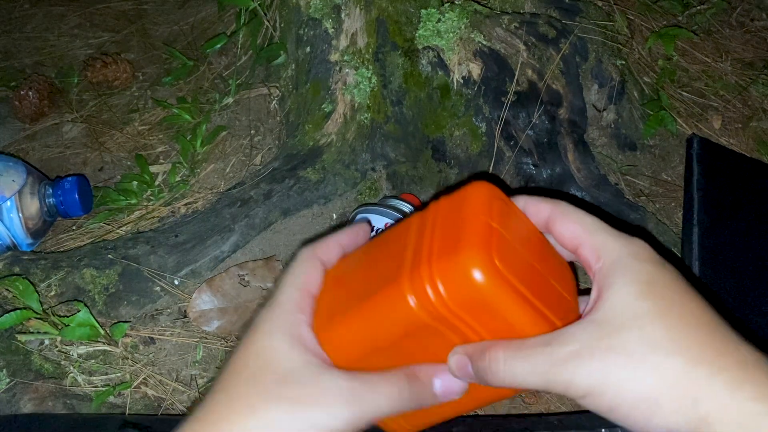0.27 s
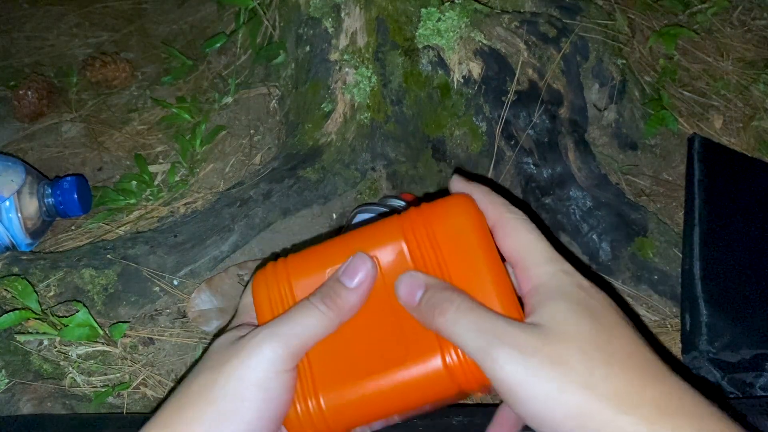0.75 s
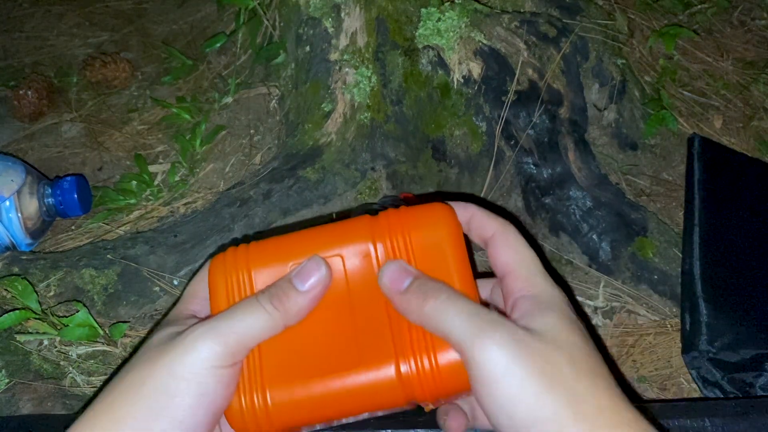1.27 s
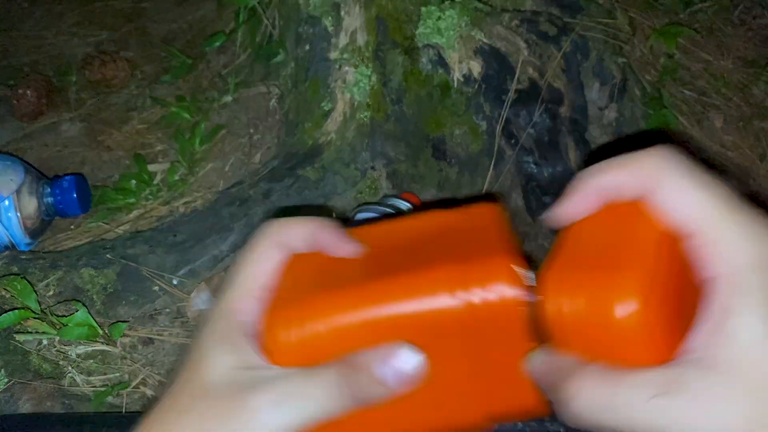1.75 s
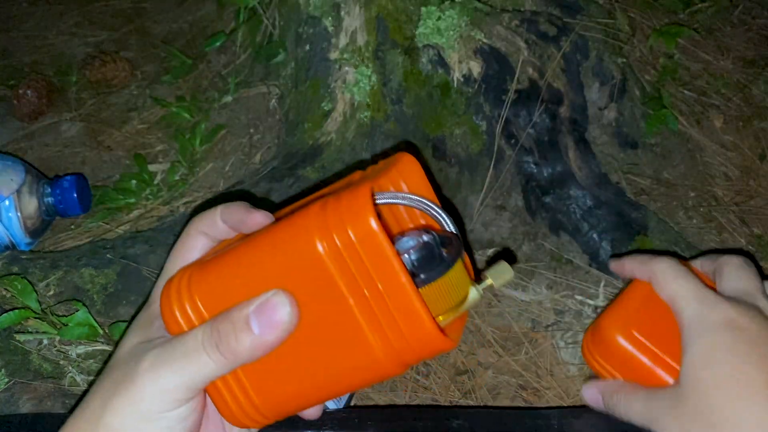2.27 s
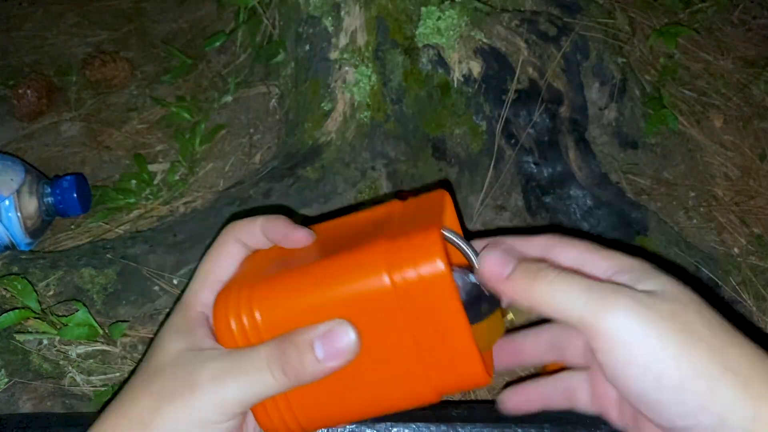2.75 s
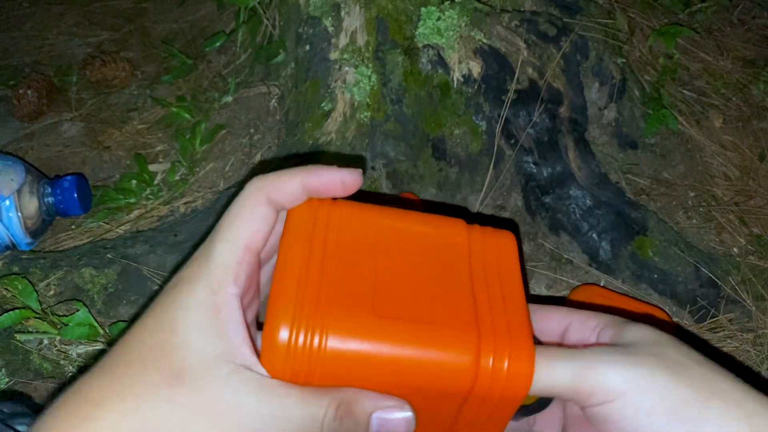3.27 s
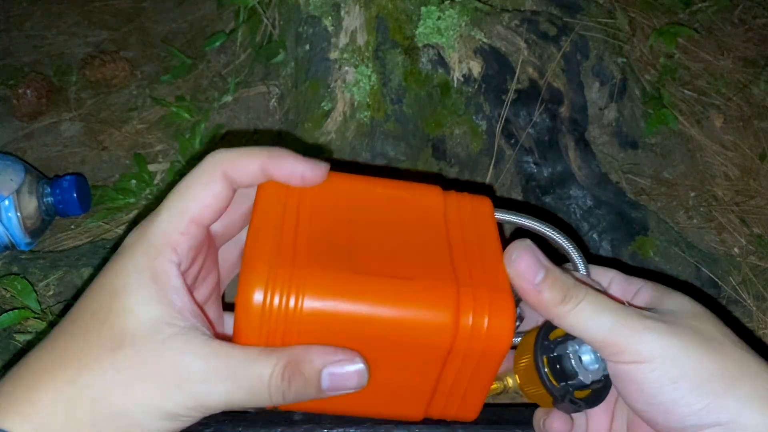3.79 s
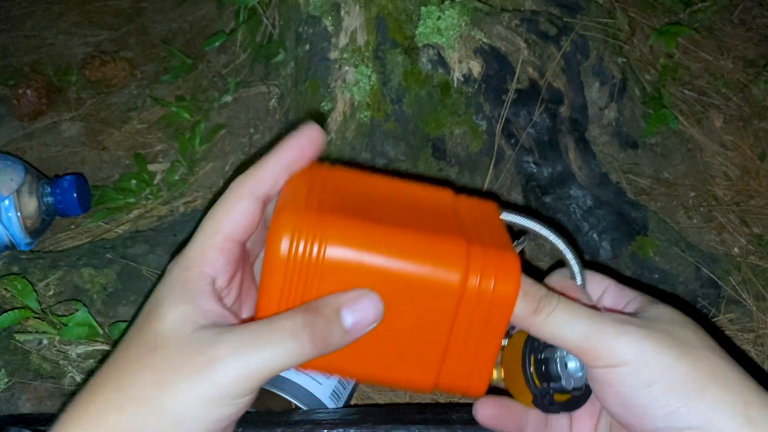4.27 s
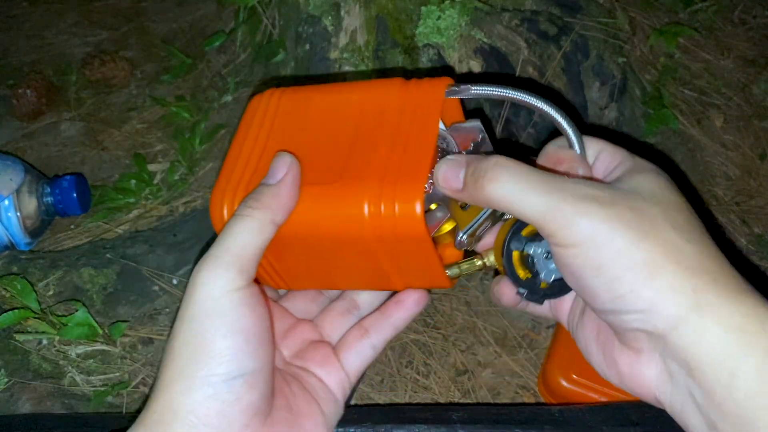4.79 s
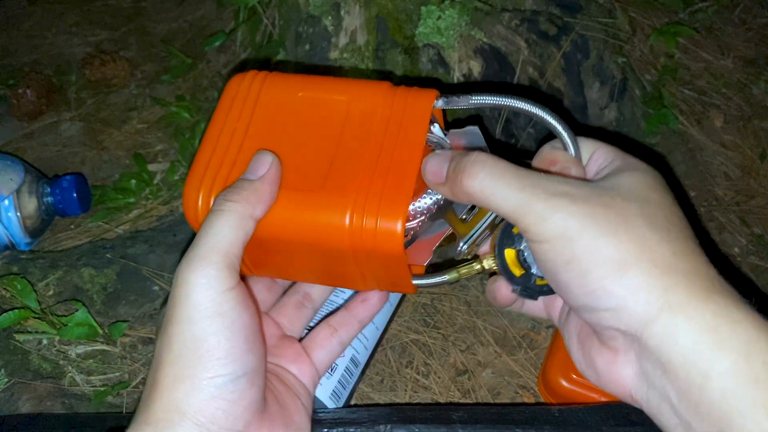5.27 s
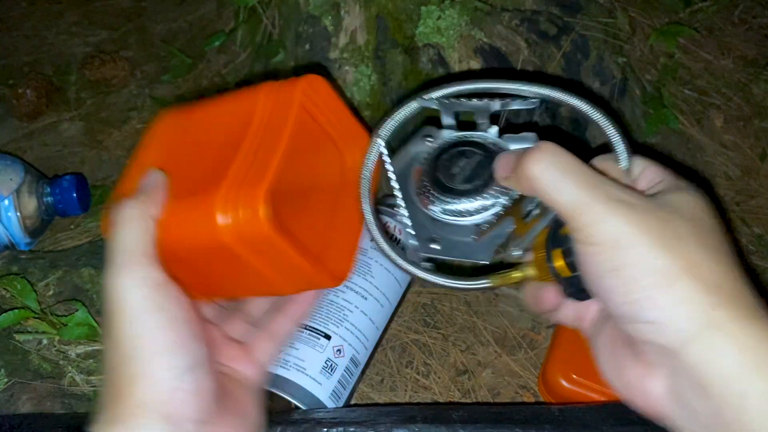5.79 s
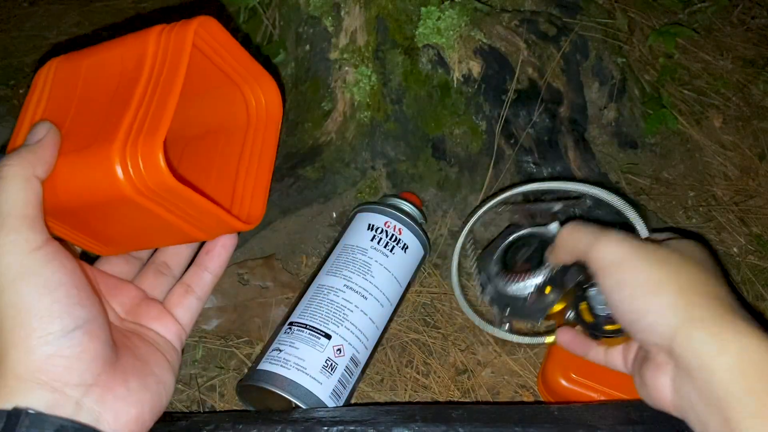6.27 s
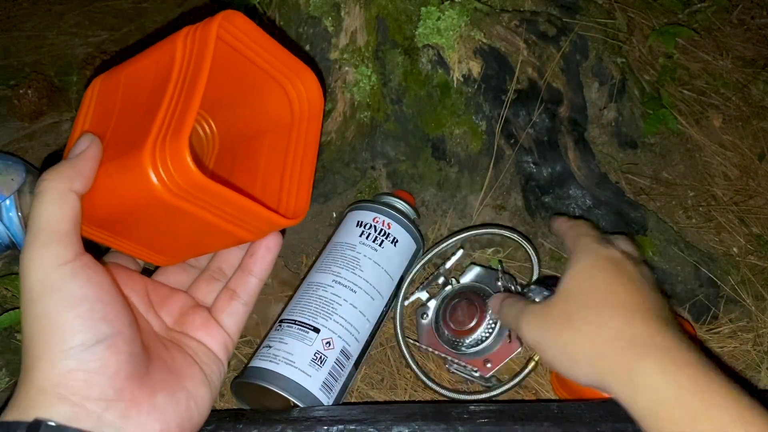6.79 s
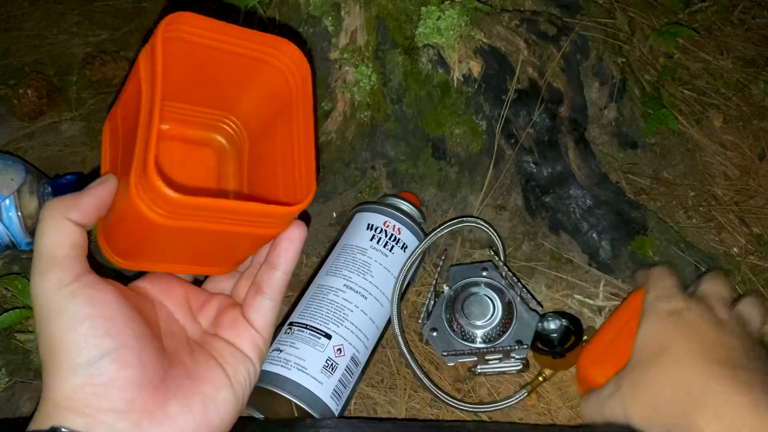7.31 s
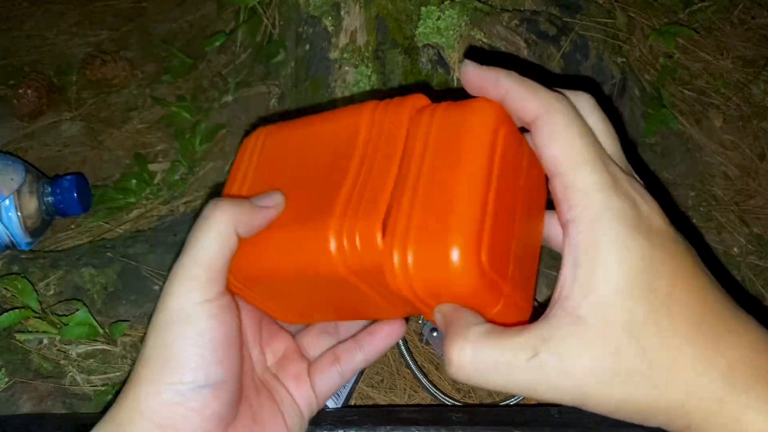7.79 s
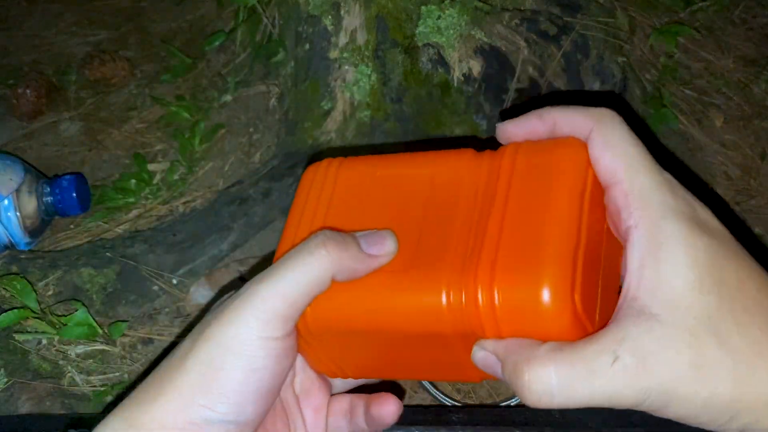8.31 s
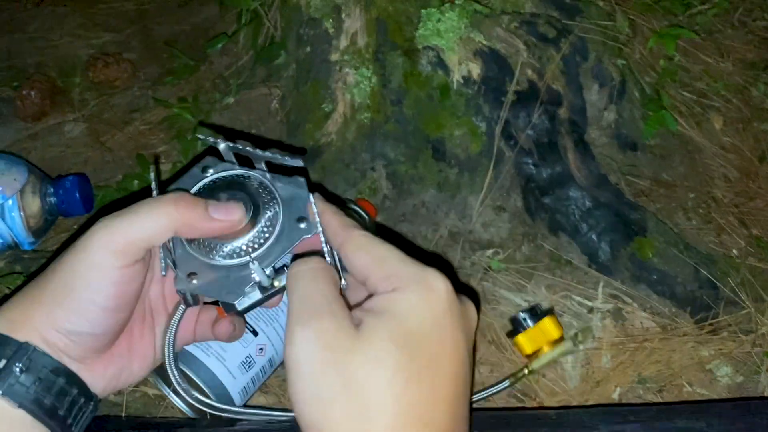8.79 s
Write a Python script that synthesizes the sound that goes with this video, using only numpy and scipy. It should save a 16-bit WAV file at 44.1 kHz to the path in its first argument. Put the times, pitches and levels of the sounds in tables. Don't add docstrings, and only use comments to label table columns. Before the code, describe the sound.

Close, dry stereo handling sounds that overload on the hardest hits. Light taps and skin rubbing on plastic, a fluttering gust, a sharp hollow pop and a dropped lid come first. Irregular small knocks, scrapes and thin steel jingles follow, then a loud release, deep wind buffeting, a ringing lid clatter and several heavy closing clacks. Things settle into small bumps over soft night air, distant insects and a faint cricket.

```python
import sys
import numpy as np
from scipy import signal
from scipy.fft import rfft, irfft
from scipy.io import wavfile

SR = 44100
rng = np.random.default_rng(int(sys.argv[2]) if len(sys.argv) > 2 else 0)


def int16_out(signal):
    q = np.round(np.clip(np.atleast_2d(signal).T, -1, 1) * 32767)
    wavfile.write(sys.argv[1], SR, q.astype(np.int16))


def volts_from_decibels(level):
    exponent = np.asarray(level, float) / 20
    return 10 ** exponent


N = 399105

# start_s, peak_db, hollow_hz
CASE_BLOWS = [(3.039, -27, 640), (3.913, -16.5, 910), (1.064, -9.5, 635), (1.245, -14.5, 588),
              (1.732, -20.5, 690), (1.781, 7, 656), (1.812, 3, 737), (1.874, -3, 760), (1.891, -2, 833),
              (1.96, -25, 530), (2.15, -21, 1240), (5.753, 11, 802), (7.791, 1.5, 832), (7.813, 7, 485),
              (7.924, 3.5, 654), (7.965, -6, 620), (7.93, -3, 608), (7.942, -12, 640), (7.982, -4, 1500),
              (7.977, -3, 637), (8.105, -8.5, 573), (8.259, -1, 530), (8.312, -13, 504),
              (8.344, -17.5, 567), (8.41, -21.5, 670), (8.597, -24.5, 513), (8.653, -30, 530),
              (1.828, -4.5, 1000), (1.902, -16, 1120), (2.01, -30, 600), (2.035, -35, 754),
              (1.066, -17.5, 1290), (2.098, -34, 700), (2.2, -28, 700), (2.225, -41, 595),
              (7.7915, -5, 1044), (7.82, -18, 1500), (7.91, -9, 1500), (7.816, 2, 840), (8.733, -25, 920)]
# start_s, peak_db, hollow_hz
STOVE_BLOWS = [(2.801, -26.5, 644), (2.892, -19.5, 610), (2.976, -27, 630), (2.995, -7.5, 517),
               (3.019, -17.5, 840), (3.108, -21, 720), (3.201, -8.5, 530), (3.242, -16, 716),
               (3.26, -12.5, 745), (3.477, -12, 690), (3.601, -16, 735), (3.706, -25.5, 910),
               (3.811, -15, 780), (4.126, -21.5, 510), (4.209, -19.5, 920), (4.27, -18.5, 1080),
               (4.388, -18, 740), (4.609, -21.5, 770), (4.705, -18, 760), (4.804, -16, 790),
               (4.842, -15, 790), (4.974, -20.5, 480), (4.995, -16, 450), (5.124, -13.5, 761),
               (5.228, -9.5, 770), (5.333, -19.5, 754), (5.354, -11.5, 766), (5.501, -22, 770),
               (5.515, -13.5, 763), (5.68, -23.5, 760), (5.79, 5, 820), (5.815, -6, 595), (7.903, -14, 690),
               (7.912, -4, 680)]
# start_s, peak_db, hollow_hz
LID_BLOWS = [(2.5455, -1.5, 884), (2.55, -4, 612), (2.595, -25.5, 1440), (2.64, -34, 1420),
             (2.656, -28.5, 1030), (6.555, -24, 1490), (6.868, 6, 600), (6.876, 6.5, 889),
             (6.902, -2.5, 1006), (6.959, -8, 656), (6.999, -11, 654), (7.03, -16, 666),
             (7.049, -16.5, 845), (7.091, -7, 610)]
# start_s, peak_db, hollow_hz
FINGER_TAPS = [(0.02, -22.5, 480), (0.058, -27, 1220), (0.076, -21.5, 854), (0.166, -13, 626),
               (0.169, -18, 1200), (0.215, -17.5, 1900), (0.235, -15, 1080), (0.265, -15.5, 570),
               (0.287, -23, 700), (0.288, -20, 1900), (0.322, -16, 1900), (0.345, -32, 1500),
               (0.495, -25, 700), (0.56, -23.5, 454), (7.156, -21.5, 1750), (7.192, -21, 2000),
               (7.204, -22, 1000), (7.268, -22, 1220), (7.332, -21.5, 686), (7.364, -16.5, 1920)]
# start_s, peak_db, hollow_hz
RATTLES = [(1.085, -19, 635), (1.523, -26, 880), (1.534, -22.5, 647), (1.671, -26, 990), (3.061, -21, 715),
           (3.124, -15.5, 855), (3.142, -21, 700), (3.322, -9, 760), (3.352, -8, 806), (3.401, -19, 860),
           (3.503, -17, 710), (3.49, -23, 714), (3.553, -22, 760), (3.721, -32, 810), (3.755, -23, 880),
           (3.768, -28, 690), (4.815, -8, 760), (4.86, -23.5, 760), (4.144, -21, 1000), (4.17, -20, 610),
           (4.293, -27, 740), (4.316, -19, 780), (4.33, -27, 1500), (4.347, -23.5, 760),
           (4.419, -25.5, 770), (4.546, -32.5, 593), (4.567, -24, 717), (4.634, -22.5, 770),
           (4.719, -27, 760), (4.749, -29, 520), (4.902, -27.5, 735), (4.925, -23, 490), (5.009, -13, 523),
           (5.054, -22, 683), (5.105, -21.5, 790), (5.138, -25, 796), (5.255, -19, 730), (5.414, -28, 756),
           (5.433, -22.5, 770), (5.559, -30, 750), (5.627, -32, 730), (6.594, -29, 1500), (6.664, -34, 961),
           (7.294, -25, 880), (7.339, -20, 1770), (7.399, -30, 1420), (7.415, -26.5, 476)]
# crack_db over the ring at MIDDLING_DB, crack loss in dB per dB, t60_s, walls_db, scuff_s
CASE_TOUCH = (-15, 0.4, 0.055, 1.5, 0.002)
STOVE_TOUCH = (-8, 0.6, 0.05, 1.5, 0.003)
LID_TOUCH = (-15, 0.55, 0.07, 4, 0.002)
FINGER_TOUCH = (0, 0.1, 0.016, -6, 0.005)
RATTLE_TOUCH = (-21, 0.3, 0.055, 1.5, 0.012)
MIDDLING_DB = -15
SCUFF_ROOM_S = 0.012
OPEN_FROM_S, OPEN_TO_S = 2.75, 5.9
# from_s, to_s
LID_ALONE = [
    (2.5, 2.7),
    (6.54, 7.5),
]
# mode_hz, width_hz, level_db
CASE_WALLS = [(400, 266, -1.5), (590, 205, 4.5), (770, 180, 3), (910, 370, 2), (1080, 770, -6),
              (1402, 68, -9.5), (1950, 820, -18)]
# mode_hz, width_hz, level_db
OPEN_WALLS = [(340, 170, -2.5), (530, 320, -0.5), (760, 84, 5), (1000, 115, -8), (1500, 110, -10.5),
              (2197, 114, -15), (2636, 53, -17.5)]
# mode_hz, width_hz, level_db
LID_WALLS = [(610, 27, 7), (880, 67, 4.5), (1031, 49, 10), (1326, 194, -1), (1490, 85, 2.5),
             (1834, 46, -3.5), (2440, 130, -8)]
# mode_hz, width_hz, level_db
DROPPED_LID = [(614, 16, 14), (860, 200, -6), (1098, 16, 9), (1427, 32, 0), (1830, 70, -9), (2476, 80, -6),
               (2960, 70, -9)]
# mode_hz, width_hz, level_db
LID_RIM = [(1350, 90, 0), (1770, 45, -3), (2300, 60, -6), (3040, 60, 0), (3660, 55, -2), (4740, 50, -2),
           (5050, 80, -5)]
# mode_hz, width_hz, level_db
CASE_RIM = [(1014, 203, 0.5), (1500, 240, 1.5), (2070, 790, -7), (2630, 93, 0.5), (3090, 320, -5),
            (4310, 400, -1.5), (5670, 1370, -3.5)]
RIM_SHARE_DB, RIM_LUCK_DB = 3.0, 5.0
# start_s, peak_db
TICKS = [(1.7776, -12), (1.791, -15), (1.8237, -7.5), (2.5448, -16.5), (2.9916, -13.5), (3.1974, -19.5),
         (3.599, -25), (3.918, -18), (4.802, -16.5), (5.3538, -15), (5.7578, -19), (5.7632, -7),
         (5.7903, 4.5), (5.81, 1.5), (6.3537, -28), (6.8581, -5.5), (7.089, -25), (7.791, -24),
         (7.808, -11), (7.9156, -10), (7.944, -16.5), (7.964, -16.5), (7.978, -10), (8.105, -14),
         (8.2557, -7), (8.307, -10), (8.3406, -17.5)]
# ring_hz, level_db
FRAME_RINGS = [(2620, 2.5), (4250, -2), (5050, -1.5)]
# start_s, peak_db
JINGLES = [(2.807, -32), (2.9946, -23), (3.0226, -24), (3.344, -14), (3.3832, -16), (3.428, -21.5),
           (3.601, -28), (3.811, -43), (4.1615, -32), (4.2088, -22), (4.268, -24), (4.38, -32),
           (4.546, -28.5), (4.571, -26), (4.7097, -29), (4.744, -38), (4.8025, -20), (4.85, -26),
           (5.0537, -23), (5.08, -38), (5.11, -40), (5.2131, -22), (5.3542, -41), (5.3805, -24),
           (5.504, -29), (5.682, -38), (6.349, -21.5)]
# ring_hz, level_db
STRIP_RINGS = [(6170, -0.5), (6790, -12.5), (5050, -1.5), (4340, -10), (2590, -8), (9700, -12)]
# start_s, rise_s, hold_s, drone_db, hiss_db
SLIDES = [(0.0, 0.0008, 0.31, -43, -36), (0.307, 0.023, 0.27, -70, -45), (3.527, 0.01, 0.035, -30.5, -47),
          (1.5, 0.032, 0.083, -50, -49.5), (1.773, 0.0035, 0.016, -16, -19),
          (1.826, 0.0023, 0.05, -21.5, -35), (2.557, 0.016, 0.023, -27.5, -35.5),
          (2.999, 0.0032, 0.033, -25, -36), (3.261, 0.065, 0.097, -23, -26.5),
          (4.77, 0.039, 0.061, -20.5, -28.5), (5.212, 0.01, 0.019, -24, -30),
          (5.335, 0.0075, 0.1, -40, -50), (5.75, 0.0022, 0.051, -2.5, -11.5),
          (6.866, 0.0021, 0.049, -27, -20.5), (7.802, 0.0023, 0.029, -18, -46),
          (7.886, 0.025, 0.085, -21.5, -33), (8.069, 0.028, 0.029, -27.5, -33.5),
          (8.237, 0.015, 0.035, -23.5, -58), (8.294, 0.013, 0.0087, -14.5, -21.5),
          (8.442, 0.0057, 0.002, -27.5, -26), (4.137, 0.027, 0.24, -39, -53.5),
          (4.288, 0.016, 0.032, -40, -50), (8.578, 0.021, 0.091, -40.5, -66.5),
          (8.688, 0.028, 0.11, -40.5, -40), (2.148, 0.0044, 0.23, -45, -48.5)]
# time_s, drone_db
PRESSURE = [(0.0, -43), (0.91, -45.5), (1.26, -47.5), (1.97, -53), (2.57, -54.5), (3.4, -26.5), (3.7, -47),
            (4.3, -41), (4.94, -41), (6.07, -50), (6.58, -50), (7.05, -31.5), (7.59, -51.5), (9.05, -72)]
SKIN_DB, SKIN_FOLLOWS, LIGHT_DB = -47.5, 0.23, -50
# freq_hz, level_db
HISS_COLOUR = [(650, -23), (1100, -8), (1300, -7.5), (2800, -8.5), (3060, -9.5), (4120, -7.5), (6220, -17),
               (8300, -7.5), (9910, -7.5), (15600, -22)]
# start_s, length_s, level_db
BRUSHES = [
    (0.0, 0.77, -43.5),
    (1.532, 0.13, -41.5),
    (1.68, 0.26, -45),
    (2.16, 0.36, -53),
    (6.915, 0.61, -51),
]
BRUSH_EDGE_S = 0.09
# start_s, length_s, rumble_db, flutter_db, fading_db
GUSTS = [
    (1.04, 0.66, -17, -21, 16),
    (1.5, 1.14, -38, -78, 0.5),
    (3.89, 0.3, -16, -62, 6.5),
    (6.019, 0.68, -13.5, -11.5, 17),
    (8.007, 0.97, -41, -33.5, 9.5),
]
GUST_EDGE_S, GUST_END_S = 0.012, 0.08
FLUTTER_PEAK, FLUTTER_SWELL_DB, FLUTTER_FADE_DB = 0.36, 16, 42
# time_s, rumble_db
BREEZE = [
    (0.0, -42),
    (1.0, -50.5),
    (2.7, -48),
    (3.8, -42.5),
    (4.3, -44.5),
    (5.2, -46),
    (6.0, -47.5),
    (6.75, -59),
    (7.6, -54),
    (9.05, -61.5),
]
BREEZE_FLUTTER_DB = 2
# start_s, peak_db, pitch_hz
EDDIES = [(1.04, -10, 186), (1.115, -1.5, 138), (1.189, -2.5, 228), (1.222, -2, 340), (1.291, -3, 304),
          (1.328, 0, 106), (1.384, -12.5, 254), (1.433, -10.5, 203), (1.459, -7, 125), (1.622, -13.5, 111),
          (3.875, -4.5, 137.5), (3.908, 2, 128), (3.944, 2.5, 110), (4.01, -1.5, 144), (4.043, -7, 97),
          (6.026, 3, 108), (6.047, 9, 111), (6.088, 7.5, 216.4), (6.146, 3, 259), (6.173, -31, 404),
          (6.188, 4, 274), (6.238, -9, 428), (6.261, -13, 380), (6.291, -18, 390), (6.097, 1.5, 250),
          (6.21, -22, 330), (6.248, -6.5, 414), (6.268, -16, 308), (6.319, -10, 354), (6.386, -8, 460),
          (6.415, -6, 344), (6.452, -15, 322), (6.576, -19.5, 150), (6.621, -34.5, 148), (1.199, -11, 370),
          (1.264, -22, 330), (1.4, -12.5, 297), (1.481, -19, 294), (0.622, -24, 204), (0.8, -21, 153),
          (0.828, -19.5, 171), (0.815, -25, 202), (0.845, -26, 190), (0.951, -22, 169), (0.574, -19.5, 278),
          (4.13, -19, 90), (6.053, -29, 760), (6.153, -35, 670), (6.238, -32, 710), (6.388, -27, 746),
          (6.535, -16.5, 553), (8.7, -24, 272), (6.352, 2, 118), (6.378, 0.5, 261), (6.401, -0.5, 180),
          (6.481, -4, 303), (6.533, -7.5, 105)]
# start_s, peak_db, pitch_hz
PUSHES = [(2.547, -13, 307), (3.39, -7, 275), (5.219, -14.5, 229), (5.506, -15, 234), (7.796, 5, 405),
          (7.928, 4.5, 340), (7.973, -7, 320), (8.116, -8.5, 270), (8.266, 2, 195), (8.293, 1, 176),
          (8.346, -6, 191)]
# start_s, peak_db
JOLTS = [(0.027, -23), (0.31, -36), (0.601, -21.5), (2.239, -23.5), (2.357, -21), (2.44, -22.5), (2.7, -37),
         (3.381, -23.5), (4.55, -45), (8.031, -33), (8.601, -30.5)]
MOUNT_HZ, MOUNT_RISE_S = 53.7, 0.02
# start_s, length_s, level_db, blur_0_to_1
BOUTS = [
    (0.25, 1.29, -43.5, 0.2),
    (7.0, 0.68, -47.5, 0.12),
    (7.56, 0.86, -50.5, 0.4),
]
BOUT_RISE_S, BOUT_FALL_S = 0.2, 0.1
# pitch_hz, width_hz, level_db
CHORUS = [(5200, 480, -50.5), (3714, 150, -60)]
# freq_hz, level_db
NIGHT_COLOUR = [(24, 0), (40, -28), (524, -7), (3080, -3.5), (4270, -7.5), (5210, -7), (7770, -12),
                (8580, 5.5), (10500, -70), (15600, -48)]
NIGHT_DB = -48
# freq_hz, level_db
PORT_TONE = [(22, -18), (50, 0), (7600, 0), (8200, -2), (8480, -12), (8800, -2), (9300, 0), (11300, 0),
             (11850, -14), (12300, -14), (12600, -2), (14300, -2), (15100, 5), (15400, -12)]
# freq_hz, left_lead_rad
PORT_LEAD = [(40, .95), (250, .65), (700, .4), (1500, .8), (4000, 1.1), (6800, .1), (8480, -3.14),
             (9730, -5.9), (12100, -9.42), (15300, -15.6)]
# freq_hz, left_over_right_db
PORT_TILT = [(60, 1), (180, 0), (550, .7), (1650, 1.7), (4970, 5), (8480, 0), (15000, 0)]


def rms_one(x):
    return x / np.sqrt(np.mean(x ** 2) + 1e-20)


def in_time(table):
    time_s, value = np.transpose(table)
    return np.interp(np.arange(N) / SR, time_s, value)


def on_grid(points):
    hz, value = np.transpose(points)
    bins_hz = np.arange(N // 2 + 1) * SR / N
    return np.interp(np.log(bins_hz + 1), np.log(hz + 1), value)


def colour(x, spectrum):
    return rms_one(irfft(rfft(x) * volts_from_decibels(on_grid(spectrum)), N))


def band(x, low_hz, high_hz):
    sos = signal.butter(2, [low_hz, high_hz], "band", fs=SR, output="sos")
    return rms_one(signal.sosfilt(sos, x))


def drift(rate_hz):
    r = np.exp(-2 * np.pi * rate_hz / SR)
    settled = signal.lfilter([1], [1, -2 * r, r * r], rng.standard_normal(N + SR))[SR:]
    return rms_one(settled)


def resonate(x, hz, width_hz):
    r = np.exp(-np.pi * width_hz / SR)
    poles = [1, -2 * r * np.cos(2 * np.pi * hz / SR), r * r]
    return signal.lfilter([(1 - r * r) / 2, 0, (r * r - 1) / 2], poles, x)


def body(force, modes, strengths_db):
    out = 0
    for k, ((hz, width_hz, level_db), more_db) in enumerate(zip(modes, strengths_db)):
        out = out + volts_from_decibels(level_db + more_db) * (-1) ** k * resonate(force, hz, width_hz)
    return out


def grit(per_s, spread_db):
    sizes = volts_from_decibels(spread_db * np.minimum(rng.exponential(1, N), 3.2)) * rng.choice([-1, 1], N)
    slips = sizes * (rng.random(N) < per_s / SR)
    return rms_one(slips) + 0.39 * rng.standard_normal(N)


def add(out, start_s, sound):
    i = round(start_s * SR)
    out[i:i + len(sound)] += sound[:N - i]


def walls_struck(start_s, lid):
    if lid:
        return DROPPED_LID if start_s < OPEN_FROM_S else LID_WALLS
    return OPEN_WALLS if OPEN_FROM_S < start_s < OPEN_TO_S else CASE_WALLS


def knocks(bright):
    out, t = np.zeros(N), np.arange(SR // 8) / SR - SCUFF_ROOM_S
    after = np.maximum(t, 0)
    click = np.arange(SR // 8) == round(SCUFF_ROOM_S * SR)
    dull = band(bright, 450, 16000)
    groups = ((CASE_BLOWS, CASE_TOUCH), (STOVE_BLOWS, STOVE_TOUCH), (LID_BLOWS, LID_TOUCH),
              (FINGER_TAPS, FINGER_TOUCH), (RATTLES, RATTLE_TOUCH))
    blows = [(*row, touch) for rows, touch in groups for row in rows]
    chance = rng.standard_normal((len(blows), len(LID_WALLS)))
    ragged = grit(900, spread_db=9.0)
    for (s, peak_db, hz, touch), luck in zip(blows, chance):
        crack_db, loss, t60_s, walls_db, scuff_s = touch
        crack_db = crack_db - loss * (peak_db - MIDDLING_DB)
        i = round((s - SCUFF_ROOM_S) * SR)
        lid = any(a < s < b for a, b in LID_ALONE)
        coming = volts_from_decibels(60 * np.minimum(t, 0) / max(scuff_s, .001))
        plain = np.resize(dull[i:i + len(t)], len(t))

        rattle = (0.01 if lid else 0.03) * np.resize(ragged[i:i + len(t)], len(t)) * (t > 0)
        scuff = 0.02 * plain * (t < 0)
        soft = np.clip(0.6 - 0.005 * peak_db, 0, .9)
        contact = (rattle + scuff) * coming * volts_from_decibels(-60 * after / t60_s) + click
        force = signal.lfilter([1 - soft], [1, -soft], contact)

        walls = body(force, walls_struck(s, lid), (2.5 if lid else 3.5) * luck)
        walls = walls * volts_from_decibels(-12 * after / t60_s)
        hollow = resonate(force, hz, 2.71 / t60_s)
        ring = hollow / np.abs(hollow).max() + volts_from_decibels(walls_db) * walls / np.abs(walls).max()
        air_thud = np.sin(2 * np.pi * 0.47 * hz * after) * volts_from_decibels(-16 - 60 * after / 0.014)

        rim = volts_from_decibels(RIM_SHARE_DB) * rms_one(body(plain, CASE_RIM, RIM_LUCK_DB * luck[::-1]))
        onset = np.clip(0.15 * coming + after / 0.002, 0, 1)
        crack = 0.37 * (plain + rim) * volts_from_decibels(crack_db - 4.5 - 60 * after / (0.84 * t60_s)) * onset
        if lid and s > OPEN_TO_S:
            edge = body(np.diff(force, prepend=0), LID_RIM, 4 * luck[::-1])
            edge = edge * np.minimum(after / .002, 1)
            crack = crack + volts_from_decibels(-12.5) * edge / np.abs(edge).max()
        blow = ring / np.abs(ring).max() + air_thud + crack
        add(out, s - SCUFF_ROOM_S, volts_from_decibels(peak_db + 1.5) * blow)
    return out


def rubbing():
    pressure_db = in_time(PRESSURE)
    drone, hiss = volts_from_decibels(pressure_db), volts_from_decibels(SKIN_DB + SKIN_FOLLOWS * (pressure_db - LIGHT_DB))
    t = np.arange(SR // 2) / SR
    for s, rise_s, hold_s, drone_db, hiss_db in SLIDES:
        past = np.maximum(t - rise_s - hold_s, 0)
        press = np.minimum(t / max(rise_s, .001), 1) ** 2
        add(drone, s, press * volts_from_decibels(drone_db - 60 * past / 0.058))
        add(hiss, s, press * volts_from_decibels(hiss_db - 60 * past / 0.04))

    shaking, slips = drift(39), grit(1600, spread_db=3.0)
    held_lid = [(hz, 5 * width_hz, db) for hz, width_hz, db in LID_WALLS]
    shut, opened, lid = (rms_one(body(slips, modes, np.zeros(len(modes))))
                         for modes in (CASE_WALLS, OPEN_WALLS, held_lid))
    n = np.arange(N)
    on_lid = sum((n > a * SR) & (n < b * SR) for a, b in LID_ALONE)
    is_open = (n > OPEN_FROM_S * SR) & (n < OPEN_TO_S * SR)
    walls = np.where(on_lid, lid, np.where(is_open, opened, shut))

    fine = colour(grit(6000, spread_db=3.5), HISS_COLOUR)
    rim = body(fine, CASE_RIM, [.5 * RIM_LUCK_DB * drift(13) for _ in CASE_RIM])
    fine = rms_one(fine + volts_from_decibels(RIM_SHARE_DB) * rms_one(rim))
    unsteady_db = 3.3 * np.clip(shaking, -3, 1.4)
    flicker_db = 0.4 * unsteady_db + 1.8 * drift(76)
    return drone * volts_from_decibels(unsteady_db) * walls + hiss * volts_from_decibels(flicker_db) * fine


def ticks(bright):
    out, t = np.zeros(N), np.arange(SR // 10) / SR
    chance = rng.standard_normal((len(TICKS), len(FRAME_RINGS)))
    for (s, peak_db), luck in zip(TICKS, chance):
        ring = sum(volts_from_decibels(db + 1.5 * k) * np.sin(2 * np.pi * hz * t) for (hz, db), k in zip(FRAME_RINGS, luck))
        i = round(s * SR)
        snap = np.resize(bright[i:i + len(t)], len(t)) * volts_from_decibels(10.5 - 60 * t / 0.018)
        touch = ring * volts_from_decibels(-60 * t / 0.026) + snap
        add(out, s, volts_from_decibels(peak_db - 9.0) * touch * np.minimum(t / 0.0026, 1))
    return out


def jingle():
    out, t = np.zeros(N), np.arange(SR // 10) / SR
    chance = rng.standard_normal((len(JINGLES), len(STRIP_RINGS) + 1))
    for (s, peak_db), luck in zip(JINGLES, chance):
        tuning = 1 + 0.01 * luck[-1]
        rings = sum(volts_from_decibels(db + 2.5 * k) * np.sin(2 * np.pi * hz * tuning * t)
                    for (hz, db), k in zip(STRIP_RINGS, luck))
        add(out, s, volts_from_decibels(peak_db - 4 - 60 * t / 0.024) * rings * np.minimum(t / 0.0015, 1))
    return out


def sleeve():
    t, shape = np.arange(N) / SR, 0
    for s, length_s, level_db in BRUSHES:
        edges = np.minimum(t - s + BRUSH_EDGE_S, s + length_s - t) / BRUSH_EDGE_S
        shape = shape + volts_from_decibels(level_db) * np.clip(edges, 0, 1)
    return shape * volts_from_decibels(2.4 * drift(13)) * band(grit(12000, spread_db=1.0), 7500, 12800)


def ground(x):
    out = np.zeros((2, N))
    high = signal.sosfilt(signal.butter(1, 1200, "high", fs=SR, output="sos"), x)
    lags = (rng.uniform(.0008, .012, 8) * SR).astype(int)
    for k, lag in enumerate(lags):
        out[k % 2, lag:] += high[:N - lag] * (-1) ** (k // 2)
    return out


def wind():
    breeze_db = in_time(BREEZE)
    low, high = volts_from_decibels(breeze_db), volts_from_decibels(breeze_db + BREEZE_FLUTTER_DB)
    for s, length_s, rumble_db, flutter_db, fading_db in GUSTS:
        t = np.arange(round(length_s * SR)) / SR
        along = t / length_s
        edges = np.clip(np.minimum(t / GUST_EDGE_S, (length_s - t) / GUST_END_S), 0, 1)
        off_db = np.interp(along, [0, FLUTTER_PEAK, 1], [FLUTTER_SWELL_DB, 0, FLUTTER_FADE_DB])
        add(low, s, edges * volts_from_decibels(rumble_db - fading_db * along))
        add(high, s, edges * volts_from_decibels(flutter_db - off_db))
    lumps, white = drift(22.3), rng.standard_normal((3, N))
    rumble = volts_from_decibels(3 * lumps) * band(white[0], 42, 140)
    flutter = volts_from_decibels(4.5 * lumps) * band(band(white[1], 120, 460), 120, 460)
    spit = volts_from_decibels(6 * lumps) * band(band(white[2], 350, 620), 350, 620)
    return low * rms_one(rumble) + high * (rms_one(flutter) + volts_from_decibels(-15.0) * rms_one(spit))


def puffs():
    out, t = np.zeros(N), np.arange(SR // 8) / SR
    bursts = EDDIES + PUSHES
    for (s, peak_db, hz), turn in zip(bursts, rng.random(len(bursts))):
        cycles = hz * (t + 0.0015 * (1 - np.exp(-t / 0.0023)))
        swing = np.sin(2 * np.pi * (cycles * (1 - 0.011 * cycles) + turn))
        swing = swing + 0.37 * np.sin(2 * np.pi * 1.665 * cycles)
        burst = volts_from_decibels(peak_db + 8.5) * swing * (t / 0.0083) * np.exp(-t / 0.0047 * 1.143)
        add(out, s - .002, signal.lfilter(*signal.butter(2, 0.62 * hz, "high", fs=SR), burst))
    return out


def jolts():
    out, t = np.zeros(N), np.arange(SR // 3) / SR
    swing = np.sin(2 * np.pi * MOUNT_HZ * t) * t / MOUNT_RISE_S * np.exp(1 - t / MOUNT_RISE_S)
    for s, peak_db in JOLTS:
        add(out, s, volts_from_decibels(peak_db) * swing)
    return out


def cricket():
    t, out = np.arange(N) / SR, 0
    beat = 2 * np.pi * (49.3 * t + 0.017 * drift(2.3))
    strokes = np.maximum(np.sin(beat) + .3, 0) ** 1.3
    sag = 1.4 * np.sin(beat) + 0.09 * drift(23)
    wing = rms_one(strokes * np.sin(2 * np.pi * 3185 * t + sag))
    scattered = rms_one(resonate(resonate(rng.standard_normal(N), 3225, 210), 3225, 210))
    for s, length_s, level_db, blur in BOUTS:
        shape = np.clip(np.minimum((t - s) / BOUT_RISE_S, (s + length_s - t) / BOUT_FALL_S), 0, 1)
        out = out + shape * volts_from_decibels(level_db) * (np.sqrt(1 - blur) * wing + np.sqrt(blur) * scattered)
    return volts_from_decibels(0.4 * drift(2.3)) * out


def night():
    shared, own = rng.standard_normal(N), rng.standard_normal((2, N))
    white = shared + 2.0 * signal.sosfilt(signal.butter(4, 7000, fs=SR, output="sos"), own)
    air = np.array([volts_from_decibels(NIGHT_DB + 3.87 * drift(4.5)) * colour(w, NIGHT_COLOUR) for w in white])
    for hz, width_hz, level_db in CHORUS:
        insects = resonate(resonate(white, hz, width_hz), hz, width_hz)
        air += volts_from_decibels(level_db + 2.0 * drift(39)) * rms_one(insects)
    return air


def scene():
    bright = colour(rng.standard_normal(N), HISS_COLOUR)
    gear = knocks(bright) + ticks(bright) + jingle() + rubbing() + sleeve()
    return gear + volts_from_decibels(-18.0) * ground(gear) + wind() + puffs() + jolts() + cricket() + night()


def band_limit(x):
    return signal.sosfilt(signal.butter(12, 15780, fs=SR, output="sos"), x)


def record(dry):
    half = volts_from_decibels(on_grid(PORT_TILT) / 2) * np.exp(.5j * on_grid(PORT_LEAD))
    ports = irfft(rfft(dry) * volts_from_decibels(on_grid(PORT_TONE)) * [half, 1 / half], N)
    clipped = ports / (1 + np.abs(ports / .99) ** 16) ** (1 / 16)
    return band_limit(clipped)


dry = scene()
out = record(dry)
int16_out(out)
```